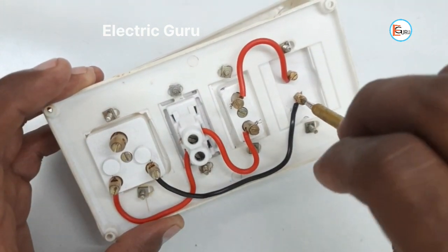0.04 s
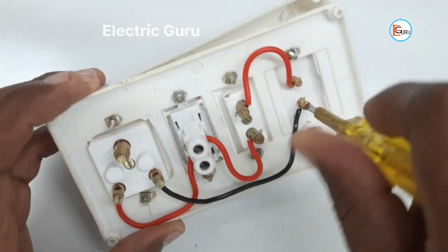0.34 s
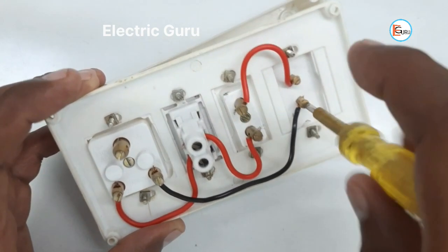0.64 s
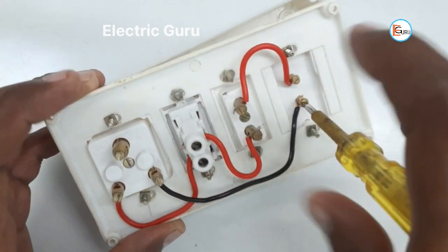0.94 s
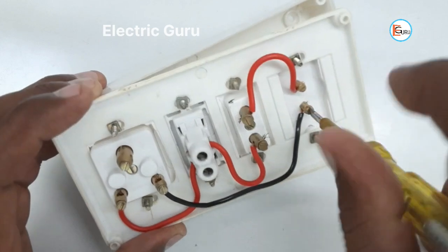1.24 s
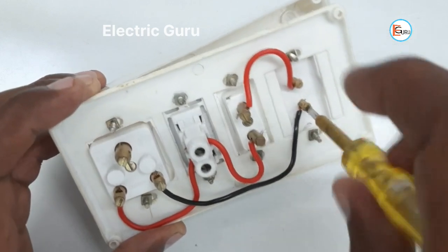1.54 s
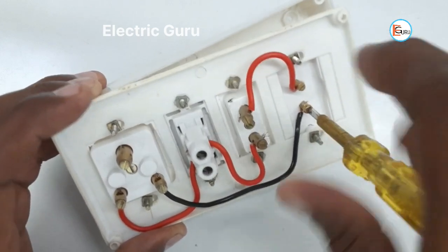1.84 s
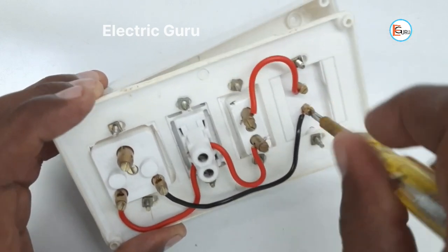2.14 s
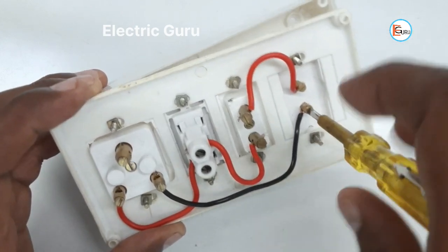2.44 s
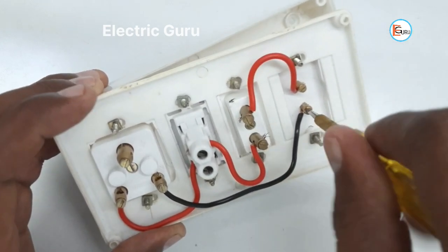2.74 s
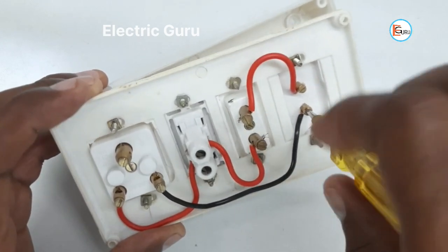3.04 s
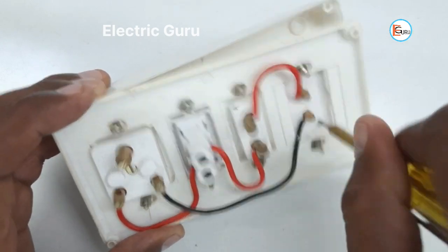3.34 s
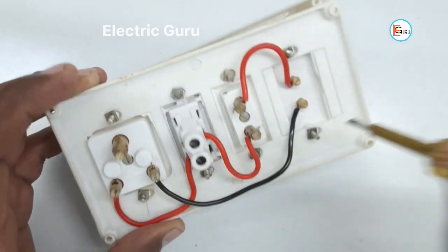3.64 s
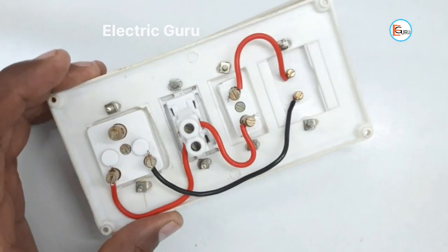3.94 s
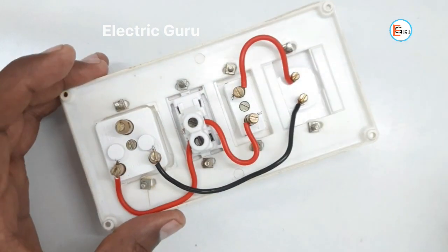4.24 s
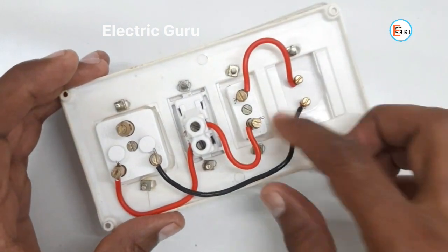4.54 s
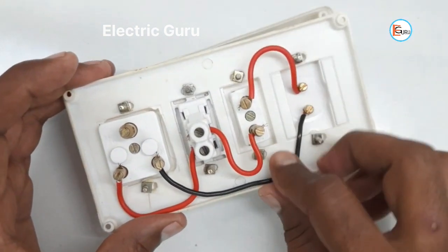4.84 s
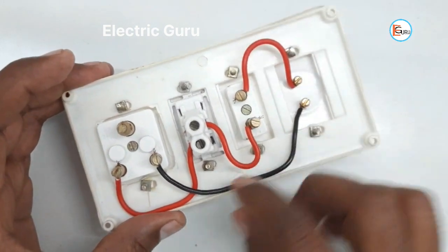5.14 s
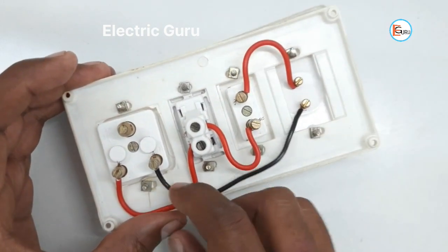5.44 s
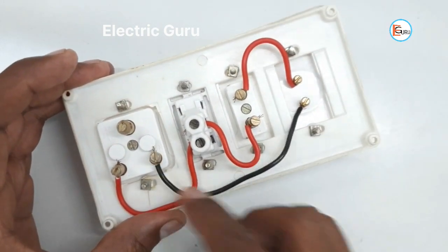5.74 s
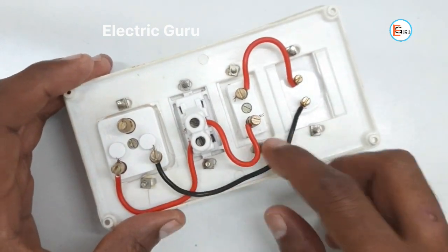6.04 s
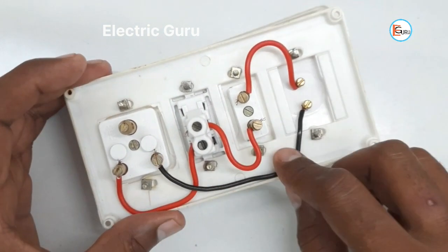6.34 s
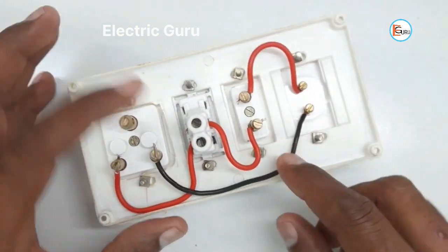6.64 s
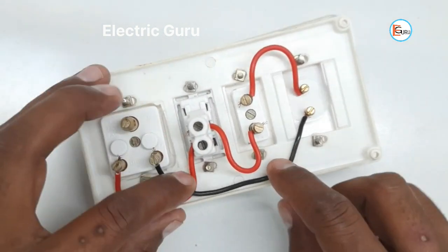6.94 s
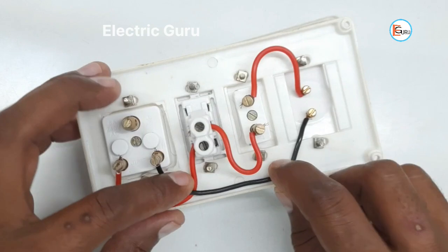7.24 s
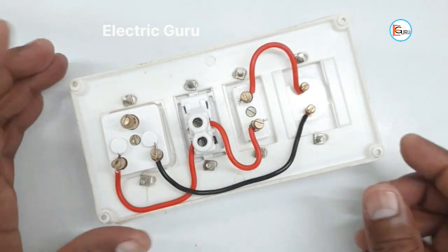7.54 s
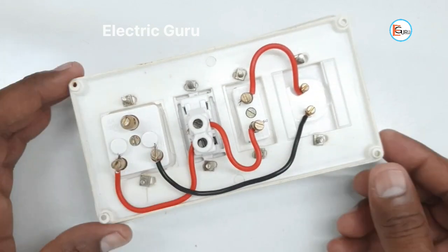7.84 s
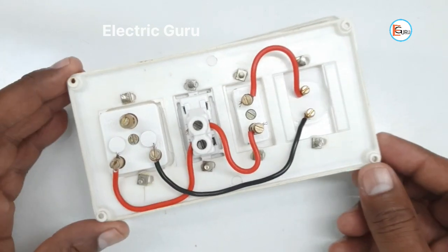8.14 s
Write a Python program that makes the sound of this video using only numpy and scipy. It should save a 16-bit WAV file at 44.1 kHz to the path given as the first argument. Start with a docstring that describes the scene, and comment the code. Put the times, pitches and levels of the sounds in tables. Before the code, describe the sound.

A screwdriver tightens a screw in a hollow plastic switchboard, its blade ticking unevenly in the slot. The board is released with a sharp clatter, and the tool lands on the table with a few knocks. Fingers then press stiff wires flat, making light ticks, a brief creak and two tiny squeaks. The microphone is close, in a bare room with a low drone and very faint, distant dove-like cooing.

```python
"""A screwdriver tightens a terminal screw in a hollow plastic switchboard, close to a mono microphone
in a bare room. The blade ticks in the slot at every turn and rings the shell; the board snaps as it is
let go, and the tool is put down on the table. Fingers then press the wires flat with ticks, a creak and
small squeaks. Far outside, behind the low drone of the building, something coos like a dove."""
import sys
import numpy as np
from scipy import signal
from scipy.fft import rfft, irfft
from scipy.io import wavfile

SR = 44100
rng = np.random.default_rng(int(sys.argv[2]) if len(sys.argv) > 2 else 0)


def unload_wav(signal):
    """Save mono or channel-first audio to the path in sys.argv[1] as 16-bit WAV at rate SR, clipped to [-1, 1]."""
    wavfile.write(
        sys.argv[1],
        SR,
        np.round(np.clip(np.atleast_2d(signal).T, -1, 1) * 32767).astype(np.int16),
    )


N = 365148

# Resonances of the hollow plastic shell. Each row: frequency in Hz, width in Hz, relative level in dB.
SHELL_MODES = [(304.4, 38, -1.5), (435.5, 41, -4.5), (588, 130, -10.5), (1017, 6.3, -7), (1252, 30, -4),
               (1602, 88, -6.5), (1965, 170, -15.5), (2207, 41, -2.5), (2576, 280, -9.5), (3226, 110, -5),
               (3310, 95, -12), (5150, 200, -6.5), (7420, 1800, -16.5), (9030, 650, -2), (10800, 2200, -17),
               (13000, 920, -8)]


def from_db(db):
    """Decibels to gain."""
    return 10 ** (np.asarray(db) / 20)


def rms_one(x):
    """Scale to rms 1."""
    return x / np.sqrt(np.mean(x ** 2) + 1e-30)


def at_level(x, db):
    """Set a hit's energy, given as its rms if it all fell within 13 ms."""
    return from_db(db) * x / np.sqrt(np.sum(x ** 2) / (.013 * SR) + 1e-30)


def band(x, low_hz, high_hz, order=2):
    """Causal band-pass."""
    sos = signal.butter(order, [low_hz, min(high_hz, .45 * SR)], "band", fs=SR, output="sos")
    return signal.sosfilt(sos, x)


def resonate(x, hz, width_hz):
    """One resonance with gain 1 at its peak."""
    r = np.exp(-np.pi * width_hz / SR)
    feedback = [1, -2 * r * np.cos(2 * np.pi * hz / SR), r * r]
    return signal.lfilter(np.array([1, 0, -1]) * (1 - r * r) / 2, feedback, x + 1e-18)


def body(x, modes):
    """Resonances in parallel; neighbouring modes move in opposite directions."""
    return sum((-1) ** k * from_db(db) * resonate(x, hz, width)
               for k, (hz, width, db) in enumerate(modes))


def add(track, s, sound):
    """Mix a sound into the last axis of a track at s seconds."""
    start = max(round(s * SR), 0)
    track[..., start:start + sound.shape[-1]] += sound[..., :N - start]


def with_room(sound, room_db):
    """Two rows: what reaches the microphone directly and the share that goes into the room."""
    return np.outer([1, from_db(room_db)], sound)


def grains(size, spread_db):
    """Friction: a dense run of tiny slips of uneven strength."""
    noise = rng.standard_normal(size)
    strength = from_db(spread_db * np.clip(rng.standard_normal(size), -2, 2))
    return rms_one(noise * strength)


def slip(rise_s, hold_s, fade_s):
    """Force of one contact: it builds, chatters briefly and then settles."""
    t = np.arange(6000) / SR
    envelope = np.minimum(t / rise_s, 1) * np.exp(-np.maximum(t - hold_s, 0) / fade_s)
    return grains(len(t), spread_db=3.5) * envelope


def voiced(ringing, levels_db):
    """Place and hardness of a contact decide how much it thuds, knocks, bites and cracks."""
    # Edges in Hz of the four registers, low to high: thud, knock, bite, crack.
    edges = [285, 950, 1700, 3300, 15500]
    return sum(at_level(band(ringing, low, high, order=3), db)
               for low, high, db in zip(edges, edges[1:], levels_db))


def shell_hit(levels_db, ring_hz):
    """One slip rings the hollow shell; its place picks the resonance that stands out."""
    force = slip(rise_s=.0018, hold_s=.0048, fade_s=.0053)
    ringing = body(force, SHELL_MODES) + resonate(force, ring_hz, width_hz=100) + from_db(-13.5) * force
    bounce = at_level(band(force, 72, 83), levels_db[0] - 13)  # the whole board bounces on the table
    return voiced(ringing, levels_db) + bounce


def room(x):
    """The bare room returns two early reflections and a diffuse tail whose treble dies first."""
    # The tail. Each row: frequency in Hz, seconds to fall 60 dB, relative level in dB.
    reverberation = [(100, 0.49, 1.5), (197, 0.83, -4), (447, 0.4, 1.5), (879.6, 0.44, 1),
                     (1340, .48, -8.5), (1740, .48, 3), (2500, 0.4, -8.5), (4970, 0.43, -4),
                     (9000, 0.29, -4), (15000, 0.17, 0.5)]
    # First reflections off table and walls. Each row: delay in seconds, gain.
    reflections = [(0.0172, 0.18), (0.033, 0.2)]
    t = np.arange(SR) / SR
    hz, t60, db = np.transpose(reverberation)
    edges = np.geomspace(70, 17000, 25)
    tail = 0
    for low, high in zip(edges, edges[1:]):
        log_centre = np.log(low * high) / 2
        decay_s = np.interp(log_centre, np.log(hz), t60)
        level_db = np.interp(log_centre, np.log(hz), db)
        noise = rms_one(band(rng.standard_normal(SR), low, high)) * np.sqrt(2 * (high - low) / SR)
        tail = tail + noise * from_db(level_db - 60 * t / decay_s)
    onset = np.clip((t - .004) / .0014, 0, 1)
    response = tail * onset * from_db(-30)
    for delay_s, gain in reflections:
        add(response, delay_s, np.array([gain]))
    return signal.fftconvolve(x, response)[:N]


def room_tone():
    """Still air and microphone hiss, with the building's low drone and a thin electric whine."""
    # Spectrum of air and hiss. Each row: frequency in Hz, relative density in dB.
    air_spectrum = [(15, -31.5), (25, 7), (49, 1), (69, -20), (101, -11.5), (126, -17), (340, -19),
                    (445, -18), (495, -17.5), (537, -17.5), (871, -21.5), (945, -21.5), (2420, -28.5),
                    (11200, -35), (15500, -35.5)]
    # Drone and whine. Each row: frequency in Hz, width in Hz, level in dB.
    drone_tones = [(40.8, 3.7, -69), (99.4, 4, -76), (152, 4, -85), (310, 6.9, -85.5), (11340, 300, -92)]
    air_hz, air_db = np.transpose(air_spectrum)
    hz = np.maximum(np.arange(N // 2 + 1) * SR / N, 1)
    colour = from_db(np.interp(np.log(hz), np.log(air_hz), air_db))
    air = irfft(rfft(rng.standard_normal(N)) * colour, N)
    air = air / np.std(band(air, 150, 15500))
    drone = 0
    for tone_hz, width_hz, db in drone_tones:
        tone = resonate(rng.standard_normal(N), tone_hz, width_hz)
        drone = drone + from_db(db) * rms_one(resonate(tone, tone_hz, width_hz))
    return from_db(-69.5) * band(air, 56, 19000) + drone


def coos():
    """Far outside, nearly pure dove-like notes arch a little in pitch."""
    # Each row: start in seconds, length in seconds, top pitch in Hz, relative level in dB.
    notes = [(1.841, 0.068, 564, -61.5), (2.135, 0.34, 571.4, -60), (2.865, .16, 598, -59),
             (5.333, 0.12, 563, -64), (5.624, 0.18, 573, -63), (5.852, 0.36, 569, -66.5),
             (6.399, 0.15, 582, -62.5)]
    out = np.zeros(N)
    for s, length, hz, db in notes:
        arch = np.sin(np.linspace(0, np.pi, round(length * SR))).clip(0)
        pitch_hz = hz * (1 + .025 * (arch - 1))
        phase = 2 * np.pi * np.cumsum(pitch_hz) / SR
        add(out, s, from_db(db) * np.sqrt(2 * arch) * np.sin(phase))
    return out


def hand_rumble():
    """The holding hand rumbles faintly; every rock of the board on the table swells and fades."""
    # Each row: start in seconds, level at the top of the swell in dB.
    rocks = [(0.91, -69), (1.27, -58.5), (1.75, -58), (2.04, -60), (2.25, -65), (2.76, -64), (3.43, -50.5),
             (4.03, -64), (7.15, -66.5)]
    rise_s, fade_s, holding_db = .035, .09, -81.5
    t = np.arange(SR) / SR
    swell = np.minimum(t / rise_s, 1) * np.exp(-np.maximum(t - rise_s, 0) / fade_s)
    effort = np.full(N, from_db(holding_db))
    for s, db in rocks:
        add(effort, s, from_db(db) * swell)
    return effort * rms_one(band(rng.standard_normal(N), 48, 100))


def rubs():
    """Skin and blade slide over board and wire, hissing and setting the shell murmuring."""
    # Each row: middle in seconds, length in seconds, shell level in dB, hiss level in dB.
    strokes = [(0.286, 0.023, -68, -66), (0.836, 0.042, -61.5, -76), (3.515, 0.038, -37.5, -40),
               (5.019, 0.082, -62.5, -64), (6.317, 0.075, -66.5, -73.5), (6.678, 0.15, -56, -67),
               (7.309, .16, -64, -84.5), (7.483, 0.064, -57, -70)]
    out = np.zeros(N)
    for s, length, shell_db, hiss_db in strokes:
        friction = grains(N // 8, spread_db=10)[:round(length * SR)]
        shell = from_db(shell_db) * rms_one(band(resonate(friction, hz=1270, width_hz=160), 540, 3200))
        hiss = from_db(hiss_db) * rms_one(band(friction, 2700, 14000))
        add(out, s - length / 2, (shell + hiss) * np.sqrt(np.hanning(len(shell))))
    return out


def wire_squeaks():
    """A wire slips on a metal fitting with a short bright chirp."""
    # Each row: start in seconds, level in dB, lowest ring in Hz.
    squeaks = [(6.9955, -46, 4810), (7.504, -49, 3340)]
    # Upper resonances of the fittings. Each row: frequency in Hz, width in Hz, relative level in dB.
    fitting_modes = [(8220, 200, 5), (9400, 240, -5), (9970, 240, -3.5), (13200, 550, -18)]
    out = np.zeros(N)
    for s, db, ring_hz in squeaks:
        force = slip(rise_s=.0013, hold_s=.0012, fade_s=.0062)
        ring = from_db(4.5) * resonate(force, ring_hz, width_hz=82)
        hiss = from_db(-25) * band(force, 8700, 10600)
        add(out, s, at_level(body(force, fitting_modes) + ring + hiss, db))
    return out


def finger_taps():
    """A fingertip lands on the shell: short dull blows with hardly any chatter."""
    # Each row: start in seconds, base level in dB, main ring in Hz.
    taps = [(3.219, -53, 560), (3.232, -57.5, 556), (3.738, -57, 540), (5.184, -57.5, 1064),
            (6.245, -56, 703), (7.063, -56, 720), (7.154, -59.5, 1360)]
    # Thud, knock, bite and crack in dB relative to the base level.
    colour_db = [-0.5, -4.5, -14.5, -22.5]
    out = np.zeros((2, N))
    for s, db, ring_hz in taps:
        force = slip(rise_s=.0003, hold_s=.00038, fade_s=.0016)
        ring = resonate(force, ring_hz, width_hz=96)
        ringing = body(force, SHELL_MODES) + ring + from_db(-13) * force
        add(out, s, with_room(voiced(ringing, db + np.array(colour_db)), room_db=-8.5))
    return out


def wire_ticks():
    """Stiff wires tick lightly against the shell as they are pressed flat."""
    # Each row: start in seconds, knock level in dB, crack in dB relative to the knock.
    ticks = [(4.728, -65, -10), (4.796, -65.5, -2), (4.851, -65, -13), (5.2168, -64, -14),
             (5.2507, -46.5, -8), (5.5004, -59.5, -12.5), (5.8931, -49, -12), (5.9078, -52.5, -13),
             (6.1373, -66.5, 7), (6.214, -66.5, -13), (6.2773, -63, -10), (6.708, -66, 3),
             (6.791, -59.5, -10), (6.985, -53.5, -6), (6.9942, -49.5, -5), (7.4308, -62.5, -10),
             (7.4589, -55, -8), (7.5034, -51.5, -2), (7.891, -61, -11)]
    thud_db, bite_db = -17, -5.5  # relative to the knock
    out = np.zeros((2, N))
    for s, db, crack_db in ticks:
        levels_db = db + np.array([thud_db, 0, bite_db, crack_db])
        add(out, s, with_room(shell_hit(levels_db, ring_hz=1358), room_db=-7))
    return out


def shell_creak():
    """Under the thumb the shell sticks and slips at a nearly even pace, groaning as it flexes."""
    start_s, peak_s, interval_s = 6.615, 6.649, .0097
    rise_db_per_s, fall_db_per_s = 484, 328
    colour_db = np.array([-12.5, 1, -4.5, -31])  # thud, knock, bite, crack
    out = np.zeros((2, N))
    for k in range(8):
        s = start_s + interval_s * (k + rng.uniform(-.11, .12))
        db = -37.5 - max(rise_db_per_s * (peak_s - s), fall_db_per_s * (s - peak_s))
        flex = slip(rise_s=.0019, hold_s=.003, fade_s=.0041)
        groan = at_level(resonate(flex, hz=249, width_hz=32), db - 19)
        add(out, s, with_room(shell_hit(db + colour_db, ring_hz=1250) + groan, room_db=-7.5))
    return out


def board_snaps():
    """The released board clatters against its base, which thumps on the table."""
    # Each row: start in seconds, thud, knock, bite and crack levels in dB, main ring in Hz.
    snaps = [(3.45, -46, -39.5, -45, -54.5, 1340), (3.4667, -58, -45, -47.5, -60.5, 1190),
             (3.5036, -39.5, -31.5, -28.5, -36, 2230), (3.5185, -32.5, -21.5, -23, -24.5, 1210),
             (3.5483, -60, -37.5, -36, -40, 2000)]
    out = np.zeros((2, N))
    for s, *levels_db, ring_hz in snaps:
        force = slip(rise_s=.006, hold_s=.006, fade_s=.012)
        thump = at_level(band(force, 70, 140), levels_db[0] - 8.5)
        add(out, s, with_room(shell_hit(levels_db, ring_hz) + thump, room_db=-6))
    return out


def tool_down():
    """The screwdriver lands and rocks: blade and handle hit the table in turn, each with its own ring."""
    # Each row: start in seconds, thud, knock, bite and crack levels in dB, main ring in Hz.
    landings = [(4.0461, -36.5, -36, -30, -38, 1780), (4.072, -41, -35, -33.5, -42.5, 2860),
                (4.1929, -35, -31, -43.5, -56.5, 1200), (4.2883, -30, -26, -27.5, -46.5, 965),
                (4.3049, -40, -35, -34.5, -74, 2210), (4.4412, -47, -48.5, -70, -85, 1210)]
    # Resonances of the tool on the table. Each row: frequency in Hz, width in Hz, relative level in dB.
    tool_modes = [(292, 15, -14), (452, 110, -3.5), (554, 110, -5.5), (744, 130, -4.5), (1105, 52, -6.5),
                  (1240, 41, 11.5), (1473, 62, -2.5), (1602, 250, -2), (2076, 160, -13.5), (2410, 130, 2),
                  (2850, 170, -1.5), (3090, 29, -2.5), (5120, 350, -7.5), (5780, 300, -4), (6940, 740, -13),
                  (8640, 450, -8), (11000, 410, -26.5)]
    out = np.zeros((2, N))
    for s, *levels_db, ring_hz in landings:
        force = band(slip(rise_s=.0007, hold_s=.0037, fade_s=.0041), 80, 11700)
        ring = from_db(-2) * resonate(force, ring_hz, width_hz=93)
        ringing = body(force, tool_modes) + ring + from_db(-14.5) * force
        thump = at_level(band(force, 120, 180), levels_db[0] - 22.5)  # the table top gives a little
        add(out, s, with_room(voiced(ringing, levels_db) + thump, room_db=-3.5))
    return out


def blade_clicks():
    """Close to the microphone the blade catches in the slot, with faint play while the screw turns."""
    # Clicks in the slot and as the blade is taken away; the row at 0.39 s is a faint echo of the loud click
    # just before it. Each row: start in seconds, base level in dB, crack offset in dB, main ring in Hz.
    clicks = [(0.1043, -62, -14, 2730), (0.2244, -61, -23, 1160), (0.2983, -55.5, -9, 1960),
              (0.3543, -35.5, -12.5, 1190), (0.3553, -47.5, -6, 2630), (0.3907, -54, -28, 1070),
              (0.451, -54.5, -30, 1060), (0.579, -61.5, -19, 1250), (0.673, -65, -34, 1240),
              (0.7817, -65, -23, 2550), (0.873, -50.5, -9.5, 1290), (0.9148, -45, -11.5, 1300),
              (1.1179, -55.5, -30, 2720), (1.2701, -44.5, -22, 1280), (1.2939, -49.5, -13, 3290),
              (1.3176, -56.5, -15, 3160), (1.326, -47, -30, 1620), (1.537, -50, -33, 1410),
              (1.579, -54.5, -35, 2650), (1.7588, -57, -18, 2580), (1.7732, -45, -34, 1930),
              (1.832, -54, -23, 1260), (1.984, -58.5, -22, 1290), (2.034, -60, -27, 1270),
              (2.054, -55, -28, 2700), (2.1, -63, -26, 1290), (2.2585, -50.5, -38, 1830),
              (2.359, -58.5, -27, 1300), (2.4294, -61.5, -29, 1250), (2.483, -53, -28, 1240),
              (2.556, -55.5, -22, 2850), (2.703, -64, -23, 1300), (2.7592, -48.5, -38, 1900),
              (2.853, -57.5, -34, 1590), (3.0444, -48, -26, 1270), (3.0848, -54.5, -19, 1280),
              (3.2118, -56.5, -38, 2900), (3.2975, -47.5, -13, 1200), (3.734, -55.5, -26, 2980),
              (3.8638, -56, -20, 1945), (3.9807, -46, -26, 1910), (4.0007, -50, -28, 1870)]
    shell_hz, thud_offset_db, bite_offset_db = 1305, -14.5, -6
    shift_db_per_octave = np.array([7, -3.5, 5, -1.5])  # thud, knock, bite, crack
    turning_s, play_per_s = (.9, 2.8), 6
    play = [(s + rng.random() / play_per_s, -67 + 1.5 * rng.standard_normal(), -21, shell_hz)
            for s in np.arange(*turning_s, 1 / play_per_s)]
    out = np.zeros((2, N))
    for s, db, crack_db, ring_hz in clicks + play:
        # A click that rings above the shell's main resonance shifts its balance and sounds drier.
        octaves = np.log2(ring_hz / shell_hz)
        colour_db = np.array([thud_offset_db, 0, bite_offset_db, crack_db])
        levels_db = db + colour_db + octaves * shift_db_per_octave
        add(out, s, with_room(shell_hit(levels_db, ring_hz), room_db=-3.5 - 2.5 * octaves))
    return out


def scene():
    """One microphone close to the board hears work, room and far coos, the same in both channels."""
    floor = room_tone() + hand_rumble()
    direct, to_room = (board_snaps() + tool_down() + wire_ticks()
                       + finger_taps() + shell_creak() + blade_clicks())
    friction = wire_squeaks() + rubs()
    far = coos()
    reverb = room(to_room + from_db(-6.5) * friction + from_db(-12.5) * far)
    mono = direct + friction + from_db(-5.5) * far + reverb + floor
    return np.array([mono, mono])


def record(dry):
    """The treble is cut steeply above 15.9 kHz."""
    return signal.sosfilt(signal.ellip(10, .1, 70, 15900, fs=SR, output="sos"), dry)


dry = scene()
out = record(dry)
unload_wav(out)
```